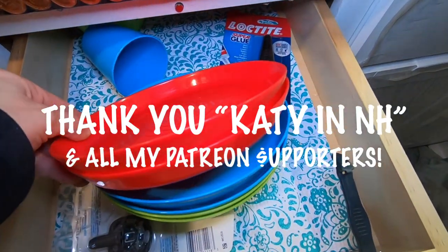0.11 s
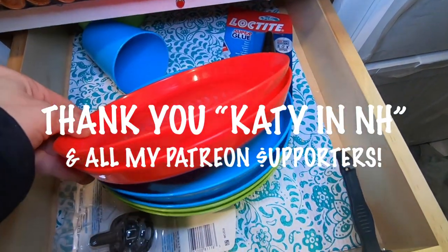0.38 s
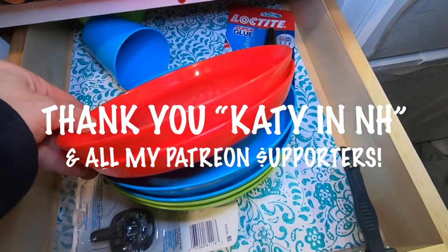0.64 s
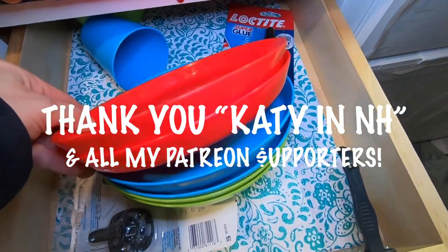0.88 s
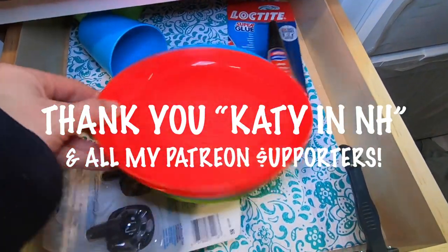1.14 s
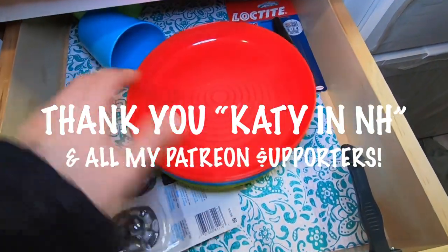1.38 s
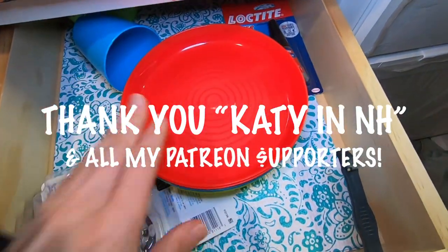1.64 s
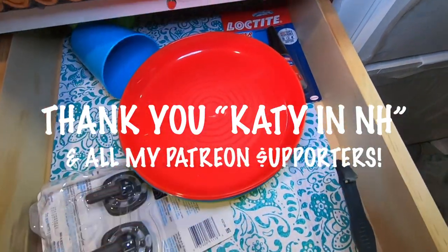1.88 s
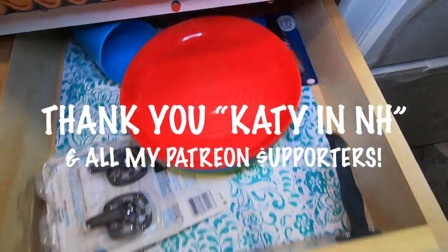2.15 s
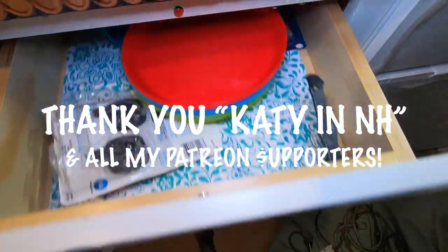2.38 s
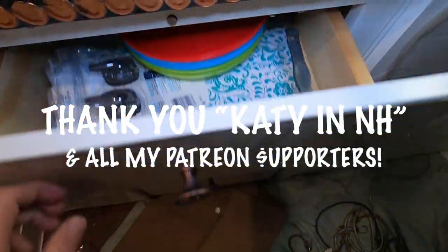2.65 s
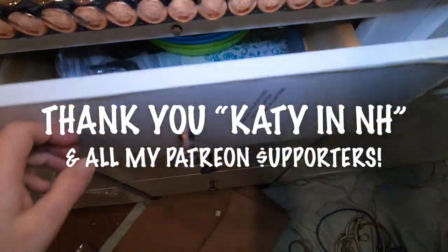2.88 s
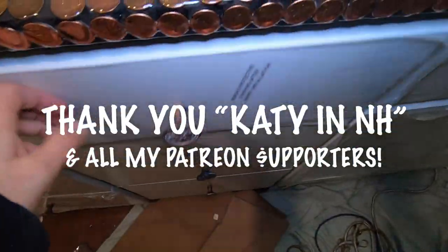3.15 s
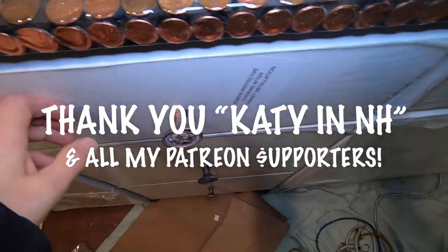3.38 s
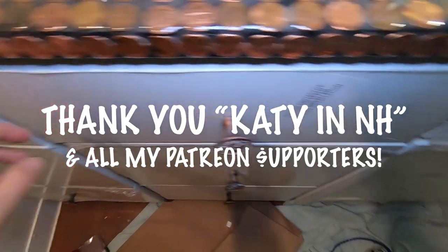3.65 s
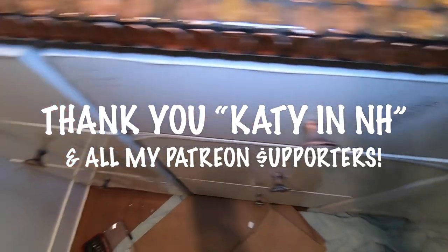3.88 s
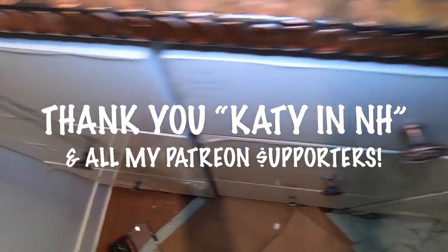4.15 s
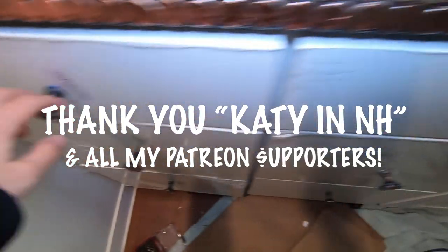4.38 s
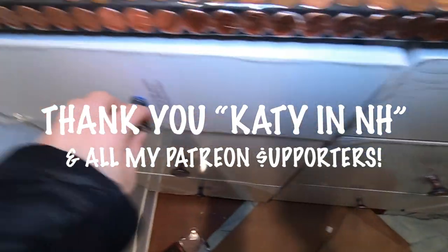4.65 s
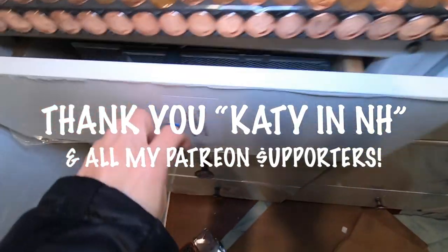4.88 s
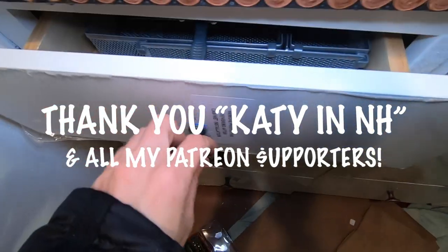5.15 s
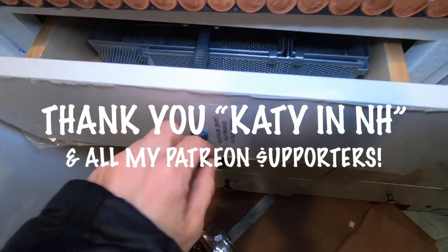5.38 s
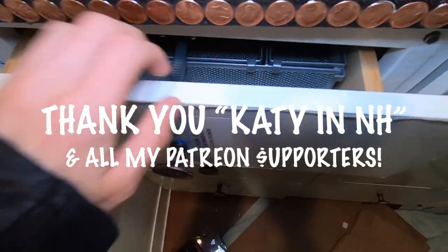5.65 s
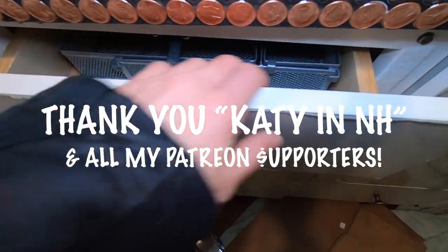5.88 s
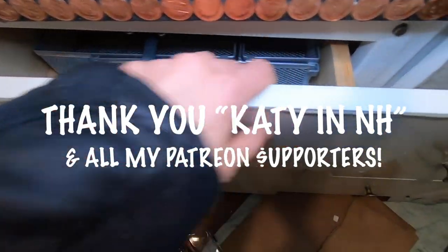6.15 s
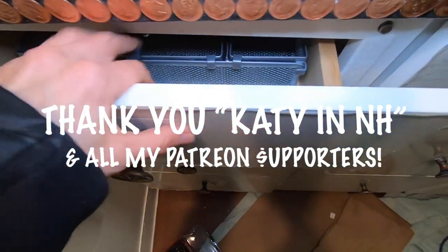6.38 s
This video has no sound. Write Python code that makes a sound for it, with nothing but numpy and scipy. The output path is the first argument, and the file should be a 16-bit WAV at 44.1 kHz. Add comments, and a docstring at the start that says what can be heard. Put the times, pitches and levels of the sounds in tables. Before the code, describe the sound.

Plastic plates clatter into a drawer, which slides shut, snaps past its catch, slams and bounces; then faint sleeve rustle and small knob clicks.

```python
"""A small van kitchen, close to a mono microphone: a held camera rumbles and small things knock in a drawer;
plastic plates clatter and chafe as they are lowered in, sleeves rustle, the drawer slides, snaps past its
catch, slams and bounces twice; a hand then pulls the next drawer by its knob. Blows are decaying noise
plus damped modes; drags, cloth and rumble are filtered noise under gain curves."""
import sys
import numpy as np
from scipy import signal
from scipy.fft import rfft, irfft, next_fast_len
from scipy.io import wavfile
from scipy.ndimage import uniform_filter1d, map_coordinates

SR = 44100
rng = np.random.default_rng(int(sys.argv[2]) if len(sys.argv) > 2 else 0)


def transcribe(signal):
    """Save signal, clipped to [-1, 1], as a 16-bit WAV file at the path in sys.argv[1]."""
    frames = np.atleast_2d(signal).T
    limited = np.clip(frames, -1, 1)
    pcm = np.round(limited * 32767).astype(np.int16)
    wavfile.write(sys.argv[1], SR, pcm)


def volts(x):
    """Linear amplitude factor 10**(x/20) for a level x in dB, scalar or array-like."""
    e = np.asarray(x, float) / 20
    return 10 ** e


N = 287529


def unit(x):
    """Scaled to rms 1."""
    return x / np.sqrt(np.mean(x ** 2) + 1e-20)


def peak1(x):
    """Scaled to a peak of 1."""
    return x / np.abs(x).max()


def along(points, hz):
    """(Hz, value) points interpolated on a log frequency axis."""
    f, v = np.transpose(points)
    return np.interp(np.log(hz + 1), np.log(f + 1), v)


def wobble(rate_hz):
    """Smooth random curve, rate_hz knots a second."""
    knots = rng.standard_normal(int(N * rate_hz / SR) + 4)
    return map_coordinates(knots, [np.arange(N) * rate_hz / SR])


def coloured(x, spectrum):
    """x through a (Hz, dB) spectrum, at rms 1."""
    m = next_fast_len(len(x) + 8192)
    gain = volts(along(spectrum, np.fft.rfftfreq(m, 1 / SR)))
    return unit(irfft(rfft(x, m) * gain, m)[:len(x)])


# room and microphone noise: [f/Hz, density/dB]
HISS = [(59, -33.5), (100, -8.5), (150, -16), (502, -12), (1150, -20.5), (1950, -24.5), (15000, -38),
        (16000, -51.5)]


def hiss():
    """Steady noise of room and microphone."""
    rms_db = -66
    return volts(rms_db) * coloured(rng.standard_normal(N), HISS)


def level(*strokes):
    """One gain per sample for each dB column after the time; silent outside the strokes."""
    t = np.arange(N) / SR
    total = 0
    for stroke in strokes:
        s, *columns = np.transpose(stroke)
        total = total + np.array([volts(np.interp(t, s, db, -120, -120)) for db in columns])
    return total


# shaking of the held camera: [t/s, level/dB]
HANDS = [(0.0, -48), (0.9, -49), (1.5, -42.5), (1.87, -46.5), (2.49, -40.5), (3.05, -43.5), (3.2, -38.5),
         (3.35, -30), (3.56, -40.5), (3.94, -46.5), (4.12, -40.5), (4.5, -48), (4.7, -43), (5.1, -47),
         (5.57, -46), (6.19, -50.5), (6.52, -49.5)]
# its spectrum: [f/Hz, density/dB]
RUMBLE = [(8.8, -24.5), (15, 0), (49, -13.5), (75, -16), (134, -33), (250, -34.5), (320, -57.5),
          (550, -120)]


def rumble():
    """Hands shake the camera: low noise of unsteady level."""
    unsteady = volts(0.45 * wobble(19))
    return level(HANDS)[0] * unsteady * coloured(rng.standard_normal(N), RUMBLE)


def grainy(scatter_db):
    """Noise whose samples vary in size: many tiny unequal contacts."""
    return rng.standard_normal(N) * volts(scatter_db * wobble(900))


def patchy(x, patch_db):
    """Random gain over pitch and time: a drag excites now one resonance, now another; rms 1."""
    z = signal.stft(x, nperseg=1024)[2]
    field = uniform_filter1d(rng.standard_normal(z.shape), size=7, axis=0)
    field = uniform_filter1d(field, size=3, axis=1)
    return unit(signal.istft(z * volts(patch_db * unit(field)), nperseg=1024)[1][:N])


def resonant(x, peaks):
    """x with resonances lifted above it, at rms 1."""
    hz = np.fft.rfftfreq(len(x), 1 / SR)
    gain = 1
    for centre, width, db in peaks:
        gain = gain + volts(db) / (1 + (2 * (hz - centre) / width) ** 2)
    return unit(irfft(rfft(x) * gain, len(x)))


def swells(rows):
    """One gain per sample for each dB column: strokes swell to a peak and die away; powers add."""
    t = np.arange(N) / SR
    power = 0
    for s, rise, fall, *dbs in rows:
        shape = volts(-20 * np.maximum((s - t) / rise, (t - s) / fall))
        power = power + np.outer(volts(dbs), shape) ** 2
    return np.sqrt(power)


# strokes of wood and plastic sliding: [peak t/s, rise/s per 20 dB, fall/s per 20 dB, level/dB]
RUNNERS = [(1.28, 0.29, 0.36, -46), (1.58, 0.054, 0.069, -44), (2.72, 0.88, 0.78, -45.5),
           (4.18, 0.58, 0.25, -57.5), (4.9, 0.67, 1, -59), (5.615, 0.035, 0.083, -51.5),
           (5.7, 1.2, 0.82, -64)]
# its spectrum: [f/Hz, density/dB]
SLIDE = [(71, -38), (120, 0), (226, -6.5), (387, -6.5), (637, -11), (1080, -14), (3400, -32), (6600, -120)]
# resonances the sliding drawer favours: [f/Hz, width/Hz, lift over the rest/dB]
WOOD = [(222, 44, 4), (300, 52, 7.5), (406, 56, 6), (542, 68, 6.5), (745, 110, 4), (1050, 57, 2)]


def sliding():
    """Wood and plastic slide: grainy noise through wood resonances, over a faint constant creep."""
    creep_db = -69.5
    gain = np.hypot(swells(RUNNERS)[0], volts(creep_db)) * volts(1.5 * wobble(25))
    wood = resonant(coloured(grainy(scatter_db=2.5), SLIDE), WOOD)
    return gain * patchy(wood, patch_db=3.2)


def ring(modes, t, rise):
    """Damped modes at new strengths, swelling in over the rise time."""
    tones = 0
    for hz, db, t60 in modes:
        strength_db = db + rng.normal(0, 1.5)
        tones = tones + volts(strength_db - 60 * t / t60) * np.sin(2 * np.pi * hz * t)
    return tones * (1 - np.exp(-t / rise)) ** 2


# decay of a blow's noise in the cramped cabin: [f/Hz, t60/s at length factor 1]
CABIN = [(200, 0.25), (1000, 0.097), (4000, 0.085), (8000, 0.089), (15000, 0.027)]


def dying(t, parts, stretch, pitch_hz, peak_db):
    """Noise of one blow, peaked at the contact's pitch: every frequency dies at its own speed."""
    hz = np.fft.rfftfreq(len(t), 1 / SR)
    gain = sum(volts(db) * unit(volts(along(spectrum, hz))) for spectrum, db in parts)
    gain = gain * (1 + volts(peak_db) / (1 + ((hz - pitch_hz) / (0.06 * pitch_hz)) ** 2))
    noise = irfft(rfft(rng.standard_normal(len(t))) * gain, len(t))
    f, s, z = signal.stft(noise, SR, nperseg=128)
    decay = volts(-60 * s / along(CABIN, f)[:, None] / stretch)
    return signal.istft(z * decay, SR, nperseg=128)[1][:len(t)]


# spectra of a blow, dull to bright: [f/Hz, density/dB]
THUD = [(120, -27), (250, -5.5), (500, -3), (1200, -10.5), (2000, -27), (4000, -67.5)]
CLATTER = [(600, -38), (1300, -3), (2500, -2), (4400, -4.5), (7000, -21.5), (10000, -43)]
TREBLE = [(3530, -19.5), (6000, -1.5), (7570, -3.5), (15000, -7), (16100, -14), (16800, -42)]
SHEEN = [(3820, -24.5), (6500, -11), (9510, -3.5), (14700, 0.5), (15600, -6), (16000, -37)]
# small hard part: [multiple of contact pitch, level/dB, share of tick t60]
TICK = [(.84, -8, .6), (1, 0, 1), (1.22, -5, .7)]


def blows(events, body_modes, crack_db, rise, swell, thud_db, top_db, peak_db, tick_db,
          tick_s=1, tick_modes=None):
    """A crack on a dying clatter, the tick of a hard part, and a body ring that swells more slowly."""
    out = np.zeros(N + SR)
    t = np.arange(2 * SR // 5) / SR
    for s, db, body_db, bright_db, stretch, pitch_hz in events:
        crack = volts(crack_db - 60 * t / 0.0086)  # t60 8.6 ms
        shape = peak1((1 + crack) * (1 - np.exp(-t / rise))) / 2.67
        parts = [(THUD, body_db + thud_db), (CLATTER, 0), (TREBLE, bright_db), (SHEEN, bright_db + top_db)]
        tick = tick_modes or [(pitch_hz * ratio, weak_db, share * tick_s) for ratio, weak_db, share in TICK]
        click = shape * dying(t, parts, stretch, pitch_hz, peak_db) + volts(tick_db) * ring(tick, t, rise)
        body = volts(body_db) * peak1(ring(body_modes, t, swell))
        out[round(s * SR):][:len(t)] += volts(db) * (click + body)
    return out[:N]


# knocks of small things: [t/s, click level/dB, body re click/dB, treble re click/dB, contact f/Hz]
CONTENTS = [(0.072, -47.5, 8.5, -8.5, 2090), (0.6697, -56.5, -2, -30, 1600), (2.015, -66, 15.5, -24, 1550),
            (2.168, -75, -15, 7, 6000), (2.274, -53, -9, -5, 1890), (2.4486, -47, -11, -30, 1580),
            (2.5118, -37.5, 2, -12.5, 1460), (2.5202, -31.5, -3.5, -11.5, 5300), (2.532, -40, 2, -11, 3060),
            (2.56, -38, -7.5, -14, 4350), (2.6055, -35.5, -21, -9.5, 4230), (2.655, -39.5, -6, -11.5, 1610),
            (2.686, -42, -6, -12, 3020), (2.79, -42, -8.5, -19, 4600), (2.7974, -36.5, -9, -8.5, 3140),
            (3.166, -29, 8, -15.5, 2650), (3.176, -30, 8, -14, 2900), (3.1956, -26, -5, -15.5, 3315),
            (3.208, -30, 4.5, -16, 2280), (3.22, -34.5, 2, -10, 2400), (3.245, -51.5, 15, -22, 2960)]
# their body: [f/Hz, level/dB, t60/s]
CONTENT_MODES = [(323, 11.5, 0.015), (234, 4.5, 0.045), (510, -3.5, 0.094), (774, -11, 0.078),
                 (1050.5, -5, 0.047)]


def small_things():
    """Small things knock: short clicks on a quickly damped body."""
    stretch = 1.5  # clatter length factor
    events = [(*row, stretch, hz) for *row, hz in CONTENTS]
    return blows(events, CONTENT_MODES, crack_db=7, rise=0.00072, swell=0.0021, thud_db=1.0,
                 top_db=-12, peak_db=2.0, tick_db=-3, tick_s=0.034)


# chafing among the plates, then in each drawer: three lists of [t/s, level/dB, treble level/dB]
SCRAPE = [
    [(1.08, -61, -70), (1.26, -58, -65), (1.415, -61.5, -71), (1.51, -70, -73), (1.64, -65.5, -76)],
    [(2.48, -68, -79), (2.564, -56, -65), (2.72, -58, -72), (2.91, -64, -71.5), (3.38, -68, -74.5),
     (3.6, -83, -77)],
    [(4.76, -70, -80), (4.82, -68, -79), (4.93, -67, -77), (5.04, -79, -89)],
]


def chafing():
    """Loose plastic chafes: patchy noise in a dull and a bright band, flickering together."""
    dull, bright = level(*SCRAPE)
    plastic = patchy(grainy(scatter_db=1.0), patch_db=2.0)
    flicker = volts(1.3 * wobble(70))
    return flicker * (dull * coloured(plastic, CLATTER) + bright * coloured(plastic, TREBLE))


# plate knocks: [t/s, click level/dB, body re click/dB, treble re click/dB, clatter length factor, contact f/Hz]
PLATES = [(1.0865, -40, 9, -26, 1, 1270), (1.14, -37, 1.5, -34, 3.2, 1980),
          (1.2054, -34, -3, -10.5, 1.8, 3090), (1.24, -45, 10.5, -13, 1.8, 3000),
          (1.256, -40.5, 5.5, -7.5, 1.1, 2990), (1.273, -39.5, -7, -16, 1, 3020),
          (1.3131, -24, 4, -21, 0.71, 2830), (1.3293, -37, 8.5, -17, 2.3, 1160),
          (1.3858, -45, 8.5, -11, 1.5, 4500), (1.424, -41.5, 3, -20, 4.3, 1080),
          (1.4471, -50, 3, -8, 1, 3000), (1.4808, -34.5, 7, -25, 1.28, 1050),
          (1.5617, -51.5, 2.5, -12, 1.3, 1290), (1.569, -39, 3.5, -19, 1.2, 1250),
          (1.5882, -37, 4.5, -20, 1.4, 1240)]
# plate body: [f/Hz, level/dB, t60/s]
PLATE_MODES = [(350.6, 9.5, 0.059), (396.6, 0, 0.16), (529, 14.5, 0.032), (572, 11, 0.055),
               (686, -10.5, 0.26), (1123, -3.5, 0.076)]


def plates():
    """Plastic plates knock together: clicks over damped plate modes."""
    return blows(PLATES, PLATE_MODES, crack_db=3.0, rise=0.00036, swell=0.0037, thud_db=1.5,
                 top_db=-4, peak_db=2, tick_db=-2.5, tick_s=0.029)


# soft hollow notes of things dragged: [middle t/s, level/dB, f/Hz, length/s from middle to -24 dB]
HOOTS = [(1.398, -41.5, 326, 0.049), (2.259, -55, 1080, 0.025), (2.314, -62, 1080, 0.028),
         (4.226, -50, 391, 0.064), (5.106, -60, 736, 0.028)]


def hoots():
    """A drag briefly catches one hollow resonance: a swelling, fading tone of unsteady pitch and strength."""
    t = np.arange(N) / SR
    waver_rad = 1.1 * wobble(75)
    flutter = volts(3 * wobble(60))
    tones = 0
    for s, db, hz, length in HOOTS:
        swell = volts(db - 24 * ((t - s) / length) ** 2)
        tones = tones + swell * np.sin(2 * np.pi * hz * t + waver_rad)
    return flutter * tones


# sleeve strokes: [peak t/s, rise/s per 20 dB, fall/s per 20 dB, rustle level/dB, sheen level/dB]
SLEEVE = [(1.69, 0.057, 0.22, -60, -75), (1.965, 0.36, 0.11, -60, -66), (2.372, 0.56, 0.22, -67, -76),
          (3.654, 0.09, 0.075, -68, -75), (3.79, 0.088, 0.48, -64, -73), (4.04, 0.34, 0.22, -59.5, -70.5),
          (4.43, 0.21, 0.32, -71.5, -90), (4.765, 0.3, 0.11, -63, -70.5), (4.87, 0.17, 1, -69, -79),
          (5.355, 0.062, 0.056, -66, -80), (5.44, 0.061, 1, -72, -94), (5.64, 0.095, 0.13, -68, -68.5),
          (6.0, 1, 0.23, -71, -80), (6.24, 0.11, 0.33, -69.5, -73), (6.41, 0.43, 0.13, -76, -71)]
# rustle spectrum: [f/Hz, density/dB]
RUSTLE = [(710, -29.5), (1200, -3), (1920, -5.5), (2740, -3.5), (6640, -10), (9000, -19), (11700, -42.5),
          (19800, -120)]


def sleeves():
    """Cloth brushes cloth: patchy noise in a rustle and a sheen band."""
    rustle, sheen = swells(SLEEVE)
    cloth = patchy(grainy(scatter_db=0.0), patch_db=2.5)
    flicker = volts(1.2 * wobble(38))
    return flicker * (rustle * coloured(cloth, RUSTLE) + sheen * coloured(cloth, SHEEN))


# catch snap: [t/s, click level/dB, body re click/dB, treble re click/dB, clatter length factor, contact f/Hz]
CATCH = [(2.8723, -11, -4, -1, 1.64, 4113)]
# drawer box (close modes beat), rail that holds the catch, spring catch: [f/Hz, level/dB, t60/s]
BOX_MODES = [(290.5, 0, .34), (293.5, -15, .8), (305, -14, .3), (405, -10, .1)]
RAIL_MODES = [(496, 2.5, .17), (738, 5, .11), (1090, -7, .08), (1262, -7, .1), (1715, -6, .1)]
CATCH_MODES = [(2812, -2, .06), (3290, -1, .07), (3371, -3, .06), (3685, -3, .06), (4022, -1, .05),
               (4110, 5, .014), (4176, -2, .07), (4728, -3, .05), (5563, -7, .09)]


def catch():
    """The spring catch snaps and rings; drawer box and rail ring with it."""
    return blows(CATCH, BOX_MODES + RAIL_MODES, crack_db=7, rise=0.00058, swell=0.0043, thud_db=-1,
                 top_db=-3.5, peak_db=-0.5, tick_modes=CATCH_MODES, tick_db=-8)


# slam and two bounces: [t/s, click level/dB, body re click/dB, treble re click/dB, clatter length factor]
DRAWER = [(3.1574, -9.5, -16.5, -29.5, 1.37), (3.345, -19.5, -11.5, -24, 1.72),
          (3.5411, -44, -8, -35, 2.26)]
# end stop: [f/Hz, level/dB, t60/s]
STOP_MODES = [(1093, -8, .07), (1430, 8, .008), (1793, -9, .07), (2455, -9, .08), (2730, -7, .07),
              (3460, -8, .06), (4414, 1, .05), (4480, 11, .007)]


def slam():
    """The drawer hits its end stop and bounces: thud, stop modes, slowly swelling box ring."""
    contact_hz = 4380
    events = [(*row, contact_hz) for row in DRAWER]
    return blows(events, BOX_MODES, crack_db=4.0, rise=0.00017, swell=0.021, thud_db=12,
                 top_db=-10.5, peak_db=-19.0, tick_modes=STOP_MODES, tick_db=-16.5)


# the slam shakes the cabinet: [t/s, sway level/dB, thump level/dB]
BOOM = [(3.159, -22, -12.5), (3.205, -26.5, -24.5), (3.349, -37, -25.5)]
# sway of the whole, thump of its panel: [f/Hz, level/dB, t60/s]
CABINET = [(28, -14.5, 1), (48, 9.5, 0.25)]
PANEL = [(115.6, -27, 1), (178, 3, 0.054)]


def cabinet():
    """The whole cabinet sways and its panel thumps: low damped modes."""
    out = np.zeros(N + SR)
    t = np.arange(SR) / SR
    for s, sway_db, thump_db in BOOM:
        sway = volts(sway_db) * ring(CABINET, t, rise=0.014)
        thump = volts(thump_db) * ring(PANEL, t, rise=0.0036)
        out[round(s * SR):][:len(t)] += sway + thump
    return out[:N]


# knocks of the next drawer's knob: [t/s, click level/dB, body re click/dB, treble re click/dB, contact f/Hz]
KNOB = [(4.041, -43, -6, -19, 856), (4.76, -40.5, -6.5, -9, 1675), (4.771, -55, -25, -14, 2590),
        (5.123, -53, 10, -30, 1650), (5.137, -52.5, 7, -30, 1210), (5.148, -60, -2, -30, 1164),
        (5.1714, -61, 23.5, -19, 1780), (5.3061, -58, 22, -15, 1538), (5.3138, -62, 26, -18, 1480),
        (5.3293, -51, 16, -24.5, 1880), (5.3447, -52, 17.5, -20, 1124), (5.352, -45.5, -9, -13, 3060),
        (5.364, -56.5, 8.5, -20, 1146), (5.6009, -57.5, 9, -8, 5010), (5.6185, -49.5, -3, -5, 3050),
        (5.636, -53.5, -17, -14, 2930), (5.638, -43, -15, -21, 1300), (5.651, -55.5, -10, 3, 3000),
        (5.656, -49, -3, -21, 1160), (6.4314, -56.5, 5.5, -14, 1130)]
# their body: [f/Hz, level/dB, t60/s]
KNOB_MODES = [(235, 0.5, 0.07), (275, -2, 0.11), (365, 2.5, 0.078), (549.4, 3.5, 0.15), (613, 5, 0.076),
              (738, -1, .05), (1142, -4, 0.045)]


def knob():
    """A hand pulls the knob: sharp small clicks over damped modes."""
    stretch = 1  # clatter length factor
    events = [(*row, stretch, hz) for *row, hz in KNOB]
    return blows(events, KNOB_MODES, crack_db=11, rise=0.0007, swell=0.0047, thud_db=-12.0,
                 top_db=0, peak_db=1, tick_db=3, tick_s=0.015)


def scene():
    """All sources reach one microphone, fed to two channels."""
    mono = hiss() + rumble() + sliding() + small_things() + chafing() + plates() + hoots()
    mono = mono + sleeves() + catch() + slam() + cabinet() + knob()
    return np.array([mono, mono])


def band_limit(x):
    """A steep low-pass at the top of the band."""
    return signal.sosfilt(signal.butter(12, 17130, fs=SR, output="sos"), x)


# faint noise, opposite in the two channels: [f/Hz, density/dB]
SIDE_NOISE = [(100, -37.5), (300, -8), (4000, -6.5), (11500, -6.5), (15500, -12.5)]


def record(dry):
    """Adds faint steady noise, opposite in the two channels."""
    rms_db = -84
    side = volts(rms_db) * coloured(rng.standard_normal(N), SIDE_NOISE)
    return band_limit(dry + np.array([side, -side]))


dry = scene()
out = record(dry)
transcribe(out)
```